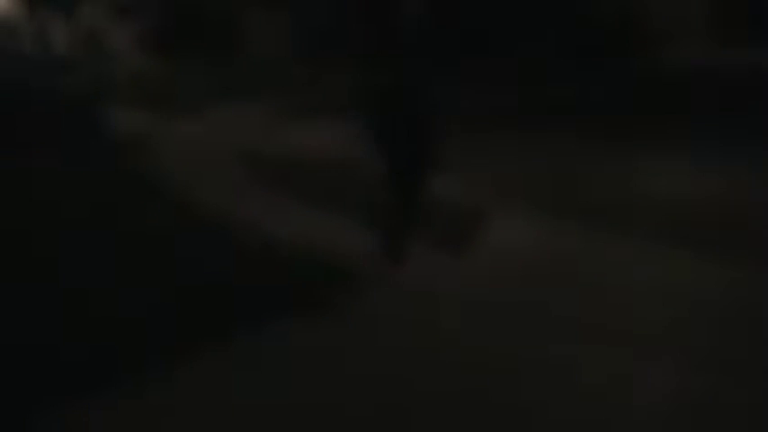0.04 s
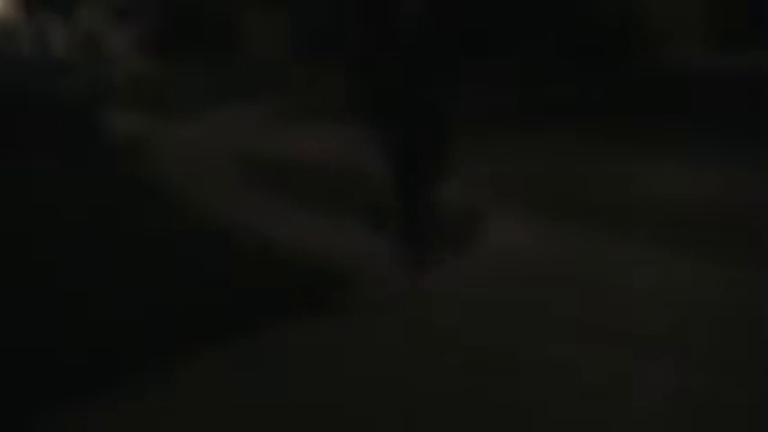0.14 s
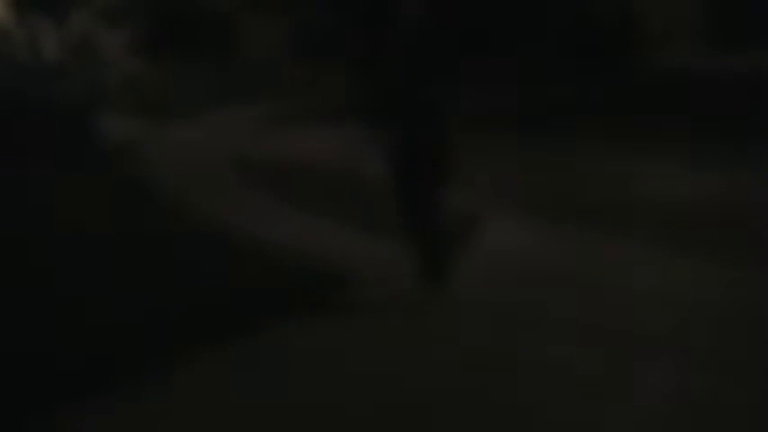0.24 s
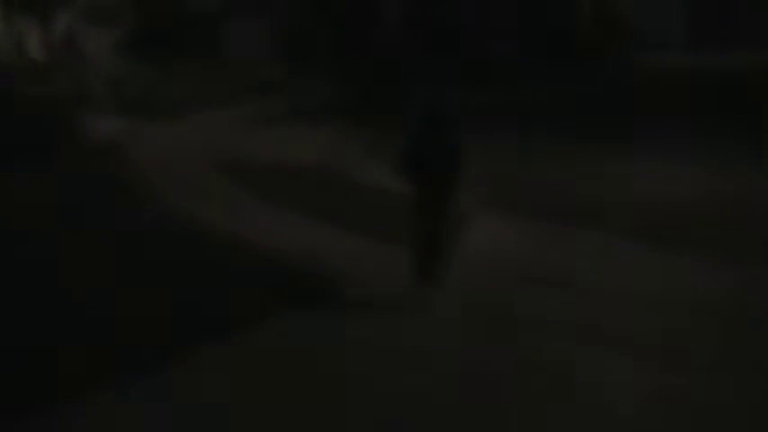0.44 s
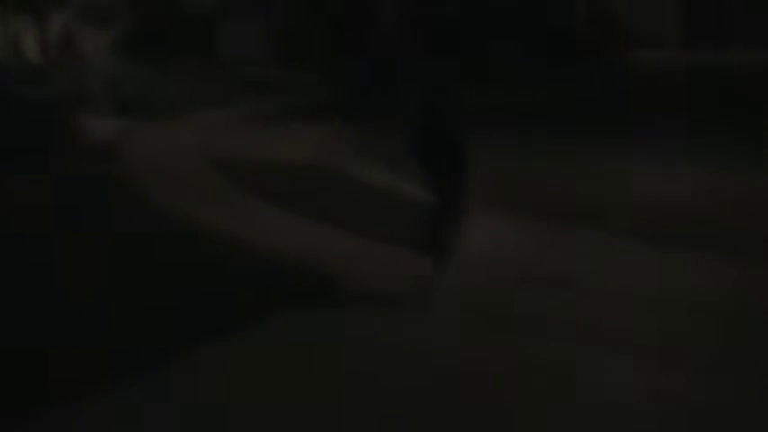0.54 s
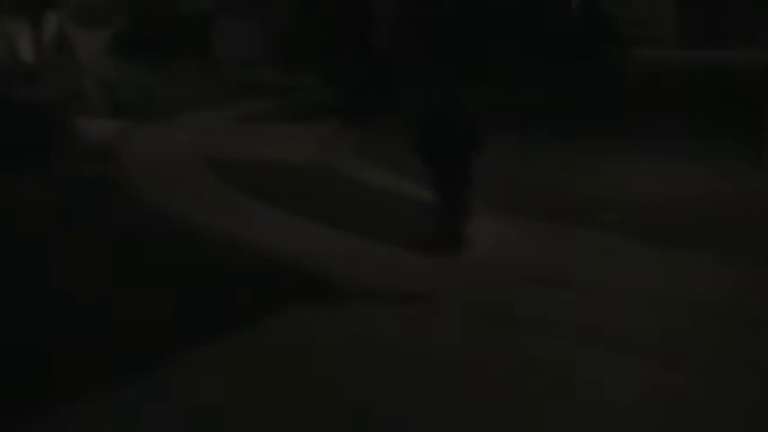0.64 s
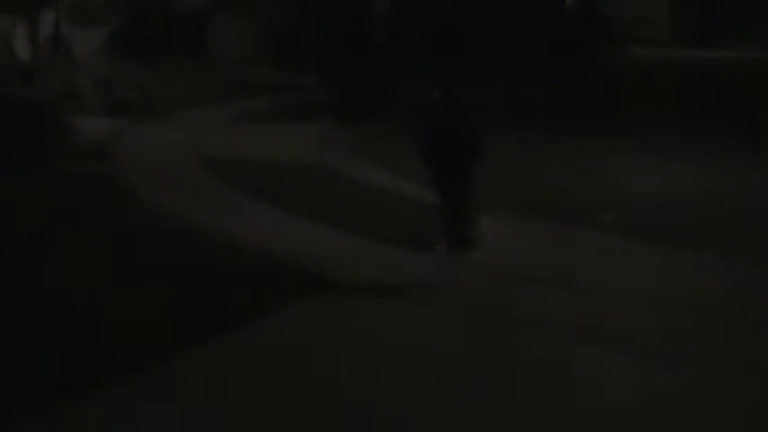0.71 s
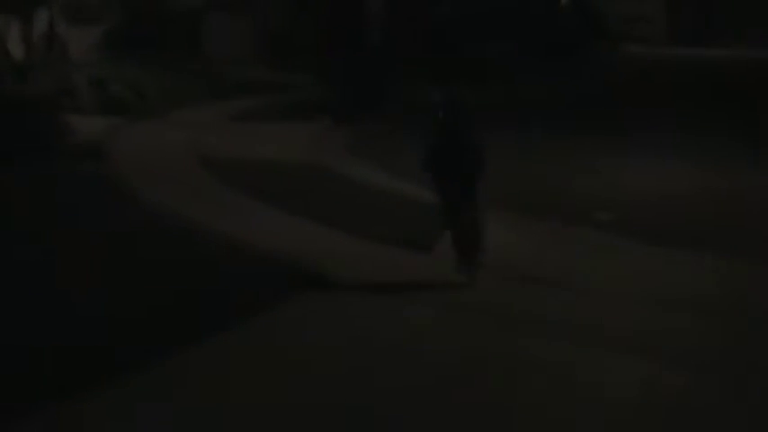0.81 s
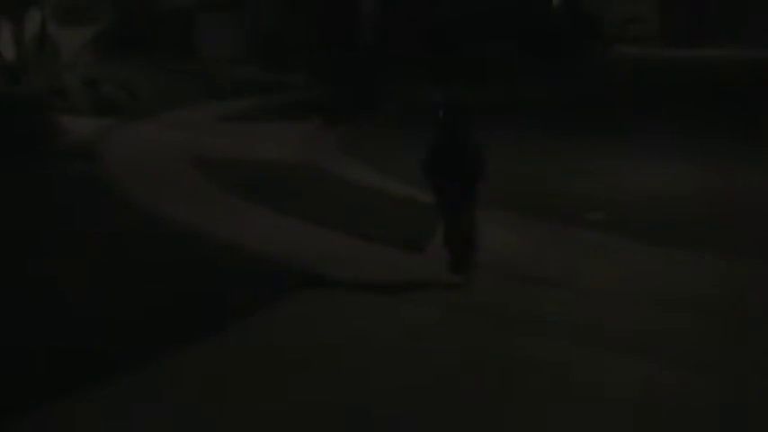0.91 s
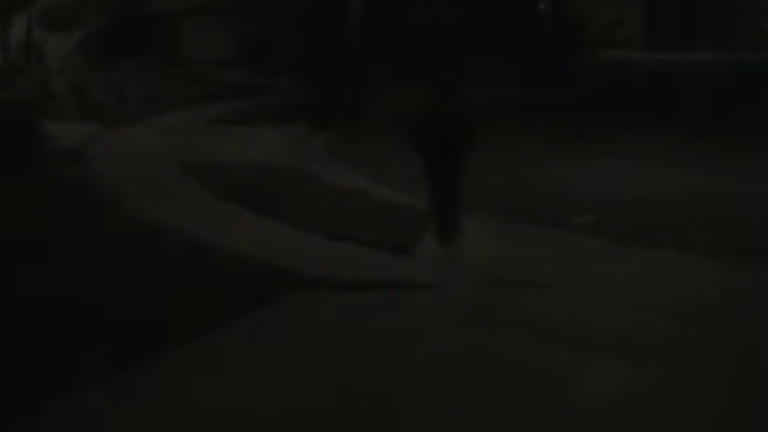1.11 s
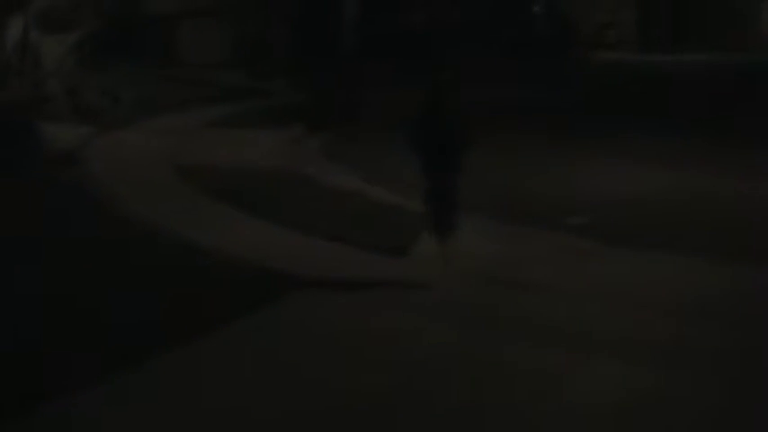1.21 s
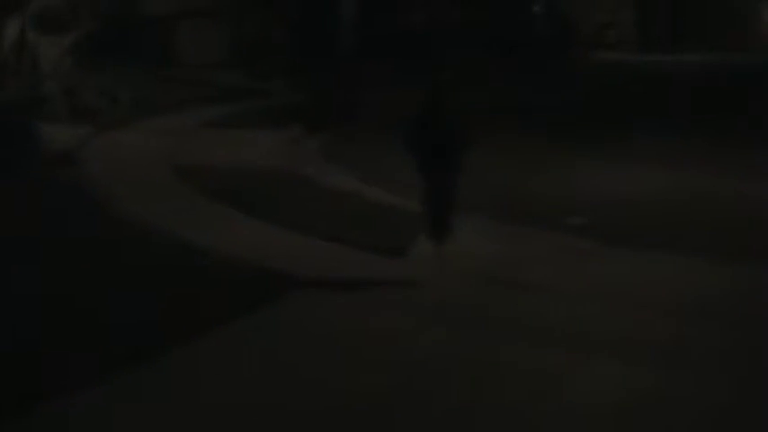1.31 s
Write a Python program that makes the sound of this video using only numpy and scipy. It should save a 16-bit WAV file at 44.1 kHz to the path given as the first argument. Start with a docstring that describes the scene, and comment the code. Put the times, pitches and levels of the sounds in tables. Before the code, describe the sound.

Pogo stick clacking and scraping through two bounces outdoors, over a low town rumble.

```python
"""Pogo stick in a night street

A pogo stick bounces twice on pavement. Each landing thumps the frame and sets the metal tube clacking.
Sliding friction makes the shaft scrape in and out; the spring hums as it extends, and the shaft strikes
its end stop. Faint ticks fall between the clacks, and houses reflect echoes over a low town rumble."""
import sys
import numpy as np
from scipy import signal
from scipy.fft import rfft, irfft, next_fast_len
from scipy.io import wavfile
from scipy.ndimage import map_coordinates

SR = 44100
rng = np.random.default_rng(int(sys.argv[2]) if len(sys.argv) > 2 else 0)


def unload_wav(signal):
    """Save mono or channel-first audio to the path in sys.argv[1] as 16-bit WAV at rate SR, clipped to [-1, 1]."""
    wavfile.write(
        sys.argv[1],
        SR,
        np.round(np.clip(np.atleast_2d(signal).T, -1, 1) * 32767).astype(np.int16),
    )


N = 59535

# the foot lands: start_s, unused, thud_db, knock_db, body_db, clang_db, crack_db
LANDINGS = [(0.246, -1, -31, -24.5, -13.5, -20, -16), (0.81, -2, -31.5, -27.5, -16, -18, -16)]
# the shaft hits its end stop: same columns
TAKEOFFS = [(0.489, -3, -33.5, -28, -24, -17, -14.5), (1.052, -1, -31.5, -23.5, -22, -24.5, -17.5)]
# modes of the tube: pitch_hz, t60_s, landing_db, first_takeoff_db, second_takeoff_db
TUBE_MODES = [(770, 0.02, -8, -10, 5), (1162, 0.034, -0.5, 1.5, -8), (1372, .07, -10.5, -35, -3.5),
              (1686, 0.043, 3.5, -31, -21), (1845, 0.061, -2, -9, -4.5), (2130, .04, 2, -16, -12),
              (2516, 0.036, -8, 6, -10), (2770, 0.035, 1.5, 11, -5), (3525, 0.085, -12, -4, -2),
              (3412, 0.072, -0.5, -34, -1), (5760, 0.041, -5.5, 5, 3.5), (6760, 0.032, -18, 3, 7.5),
              (7950, 0.039, 0.5, 5.5, 3), (9160, 0.016, -13, 12, -24)]
ONSET_LEAD_S = 0.000688  # first touch comes just before the full blow


def amp(db):
    """Decibels to amplitude ratio."""
    return 10 ** (np.asarray(db) / 20)


def unit(x):
    """Normalisation to rms 1."""
    return x / np.sqrt(np.mean(x ** 2) + 1e-20)


def along(points, hz):
    """Interpolation of (hz, value) points on a log frequency axis."""
    f, v = np.transpose(points)
    return np.interp(np.log(hz + 1), np.log(f + 1), v)


def filtered(x, response):
    """Linear filtering: the spectrum of x times a frequency response."""
    m = next_fast_len(N + SR // 2)
    return irfft(rfft(x, m) * response(np.fft.rfftfreq(m, 1 / SR)), m)[..., :N]


def resonance(f, hz, width_hz):
    """Frequency response of a damped oscillator."""
    return 1j * f * width_hz / (hz * hz - f * f + 1j * f * width_hz)


def band(x, lo_hz, hi_hz, order=2):
    """Causal band-pass filter."""
    sections = signal.butter(order, [lo_hz, min(hi_hz, SR / 2 - 1)], 'band', fs=SR, output='sos')
    return signal.sosfilt(sections, x)


def since(start_s):
    """Elapsed seconds at each sample."""
    return np.arange(N) / SR - start_s


def fade(start_s, attack_s, hold_s, decay_s):
    """Envelope: linear rise, hold and exponential decay."""
    t = since(start_s)
    return np.clip(t / attack_s, 0, 1) * np.exp(-np.maximum(t - hold_s, 0) / decay_s)


def wobble(rate_hz):
    """Smooth random modulation: a spline through rate_hz knots a second."""
    knots = rng.standard_normal(int(N * rate_hz / SR) + 4)
    return map_coordinates(knots, [np.arange(N) * rate_hz / SR])


def noise(spectrum):
    """Spectrally shaped noise of rms 1."""
    return unit(filtered(rng.standard_normal(N), lambda f: amp(along(spectrum, f))))


def grit(rate_hz, spread_db):
    """Shot noise of rms 1: tiny random contacts of uneven size."""
    contacts = (rng.random(N) < rate_hz / SR) * rng.choice([-1, 1], N)
    return unit(contacts * amp(spread_db * np.clip(rng.standard_normal(N), -2, 2)))


def night():
    """Background noise: town rumble and distant air, with a faint treble hiss that rises and falls; at first it
    is the dying tail of an earlier bounce."""
    # spectra of the three layers: frequency_hz, level_db
    rumble = [(15, -52), (25, -24), (54, -20), (97, -2), (129, -7), (190, -7.5), (281, -12.5), (394, -18),
              (500, -26), (650, -44.5), (1100, -120)]
    air = [(180, -19), (300, -10.5), (396, -0.5), (515, 0), (1110, -0.5), (1440, -7), (2690, -7.5),
           (5350, -18), (8190, -19.5), (15000, -42)]
    hiss = [(800, -5), (2200, 1), (4500, -5.5), (8500, -8), (12000, -24), (16000, -50)]
    # envelope of the hiss: time_s, level_db
    hiss_levels = [(0, -48.5), (0.13, -47), (0.21, -59), (0.6, -51), (0.78, -55.5), (1.22, -52),
                   (1.35, -72)]
    hiss_db = np.interp(since(0), *np.transpose(hiss_levels))
    return amp(-49) * noise(rumble) + amp(-51) * noise(air) + amp(hiss_db) * noise(hiss)


def street(x):
    """Reflection and scattering: a thin diffuse tail and smeared echoes from the houses."""
    # reverberation time: frequency_hz, t60_s
    decay_times = [(150, 0.21), (600, 0.68), (1500, 0.38), (4000, .4), (8000, 0.26), (15000, 0.15)]
    # walls and house fronts: delay_s, level_db, smear_s, cutoff_hz
    walls = [(.048, -26, 0.0078, 4090), (0.188, -30, .02, 6800), (0.388, -28.5, .025, 2600)]
    hz, t, spectra = signal.stft(rng.standard_normal(N), SR, nperseg=256)
    decay = amp(-60 * t / along(decay_times, hz)[:, None])
    tail = signal.istft(spectra * decay, SR, nperseg=256)[1][:N] * fade(0.0078, 0.0041, 1, 1)
    response = amp(-21) * unit(tail)
    for delay_s, db, smear_s, cutoff_hz in walls:
        reflection = band(rng.standard_normal(N), 650, cutoff_hz) * fade(delay_s, 0.0017, 0, smear_s)
        response += amp(db) * unit(reflection) * np.sqrt(cutoff_hz / (SR / 2))
    echo = signal.fftconvolve(x, response / np.sqrt(N))[:N]
    blur_rad = 1.97 * wobble(rate_hz=220)  # scattering blurs the pitch
    return np.real(signal.hilbert(echo) * np.exp(1j * blur_rad))


def ticks():
    """Transients: an earlier bounce's echo off the houses, then the stick's rattles or close echoes."""
    # faint ticks: start_s, level_db, band_hz
    bursts = [(0.121, -39, 2900), (0.256, -24, 5100), (0.271, -36, 4800), (0.316, -38, 2400),
              (0.408, -45, 2480), (0.428, -37.5, 7100), (0.473, -32, 8100), (0.504, -22.5, 2480),
              (0.838, -32, 7600), (0.858, -48, 7500), (0.869, -32.5, 7700), (0.996, -37, 1600),
              (1.064, -28, 3590)]
    return sum(amp(db) * fade(s, 0.00042, 0.0044, 0.0042)
               * unit(band(grit(rate_hz=7000, spread_db=8), hz / 1.9, hz * 1.305, order=3))
               for s, db, hz in bursts)


def spring():
    """Narrow-band resonance: the coil hums roughly as it extends."""
    # swells of the hum: centre_s, spread_s, level_db
    hums = [(0.452, 0.021, -39.5), (1.005, 0.0118, -40)]
    level = sum(amp(db) * np.exp(-(since(s) / spread_s) ** 2 / 2) for s, spread_s, db in hums)
    hum = filtered(rng.standard_normal(N), lambda f: resonance(f, hz=574, width_hz=74) ** 2)
    return level * unit(hum)


def foot():
    """Heavily damped vibration: the rubber tip scuffs, and each blow thumps the frame."""
    # thumps of the frame: start_s, level_db, pitch_hz
    thumps = [(0.2440, -13.5, 207.5), (0.4885, -23, 221), (0.8090, -22.5, 245), (1.0528, -33.5, 267)]
    scuff = (0.2372, -24, 339)  # the tip touches just before the first landing
    return sum(amp(db) * fade(s, 0.0021, 0.0047, 0.0034) * np.sin(2 * np.pi * hz * since(s))
               for s, db, hz in [*thumps, scuff])


def scrape(spectrum):
    """Stick-slip friction: grit in the shaft's guide excites the tube's resonances."""
    # resonances of the tube: pitch_hz, width_hz, level_db
    rings = [(1200, 98, 14), (1360, 67, -12.5), (1830, 390, 8), (3560, 210, 8.5)]

    def body(f):
        ringing = sum(amp(db) * resonance(f, hz, width_hz) for hz, width_hz, db in rings)
        return amp(along(spectrum, f)) * (1 + amp(-9) * ringing)

    friction = grit(rate_hz=9000, spread_db=3.5) * amp(2.5 * wobble(rate_hz=240))
    return unit(filtered(friction, body))


def shaft():
    """Friction noise follows sliding speed: the shaft slows to a stall, then speeds up and brightens."""
    # spectra of the inward and outward scrapes: frequency_hz, level_db
    in_spectrum = [(150, -40), (250, -2.5), (505, -10), (569, -1.5), (788, -7), (1410, -3.5), (2360, -11),
                   (8100, -11), (11400, -19.5), (15000, -52.5)]
    out_spectrum = [(150, -48), (250, -16.5), (569, -3.5), (951, -6.5), (1250, -3), (2400, -9), (2800, -6),
                    (9130, -11), (10800, -18), (15000, -46)]
    full_speed_db = [(-28, -28, -30.5), (-27, -28.5, -42)]  # each bounce: in, out, rasp
    squeeze_s, release_s, stall_db = 0.12, 0.1, -21.5  # from full speed to rest: times, level change
    inward, outward, rasp = np.zeros((3, N))
    for (down, *_), (up, *_), (in_db, out_db, rasp_db) in zip(LANDINGS, TAKEOFFS, full_speed_db):
        contact = fade(down, 0.0048, up - down, 0.014)
        gone_s, left_s = np.maximum(since(down), 0), np.maximum(-since(up), 0)
        inward += contact * amp(in_db + stall_db * (gone_s / squeeze_s) ** 1.35)
        outward += contact * amp(out_db + stall_db * (left_s / release_s) ** 1.55)
        rasp += contact * amp(rasp_db) * np.exp(-left_s / 0.021)  # swells toward the end stop
    sliding = inward * scrape(in_spectrum) + outward * scrape(out_spectrum)
    return sliding + rasp * unit(band(grit(rate_hz=4000, spread_db=-8), 3600, 9600, order=3))


def snaps():
    """Hard contacts are brief and so bright: metal snaps on metal at the end stop."""
    lag_s, levels_db = 0.00061, [-18, -28.5]
    return sum(amp(db) * fade(s + lag_s - ONSET_LEAD_S, 0.000214, 0.0006, 0.00063)
               * unit(band(grit(rate_hz=19400, spread_db=8.5), 5500, 12500))
               for (s, *_), db in zip(TAKEOFFS, levels_db))


def clack(s, levels_db, modes_db, attack_s, hold_s, decay_s, chatter_db, chatter_s, ring_db):
    """Impact and modal decay: a burst of metal contacts, their chatter and the ringing tube."""
    # thud, knock, body, clang and crack bands: low_hz, high_hz, trim_db
    registers = [(160, 347, -2.5), (601, 1050, 0.5), (1098, 2240, -1), (2576, 4100, -1), (5350, 9790, -1)]
    blow = fade(s, attack_s, hold_s, decay_s)
    chatter = amp(chatter_db) * fade(s, attack_s, hold_s, chatter_s)
    x = grit(rate_hz=14000, spread_db=4.5) * (blow + chatter)
    for (hz, t60_s, *_), db in zip(TUBE_MODES, modes_db):
        ring = amp(ring_db + db) * fade(s, attack_s, 0, t60_s / np.log(1000))
        x += ring * np.sin(2 * np.pi * (hz * since(s) + rng.random()))
    share = np.sqrt(0.03 * SR / N)  # refers each band's rms to 30 ms
    return share * sum(amp(db + trim_db) * unit(band(x, lo, hi, order=3))
                       for db, (lo, hi, trim_db) in zip(levels_db, registers))


def clacks():
    """Excitation sets timbre: blunt landings chatter, the sharp end stop rings."""
    _, _, landing_modes, *takeoff_modes = np.transpose(TUBE_MODES)
    down = sum(clack(s - ONSET_LEAD_S, levels, landing_modes, attack_s=0.0019, hold_s=0.0029,
                     decay_s=0.0023, chatter_db=1, chatter_s=0.011, ring_db=-8.5)
               for s, _, *levels in LANDINGS)
    up = sum(clack(s - ONSET_LEAD_S, levels, modes, attack_s=0.0011, hold_s=0.0015,
                   decay_s=0.0032, chatter_db=-11.5, chatter_s=0.015, ring_db=-9.5)
             for (s, _, *levels), modes in zip(TAKEOFFS, takeoff_modes))
    return amp(-6) * down + amp(-4.5) * up


def scene():
    """Mid-side stereo: the stick is straight ahead; echoes and background are a little wider."""
    # stereo width: frequency_hz, side_db
    width = [(30, -20.5), (100, -19.5), (1000, -16), (5000, -17.5), (9000, -11), (12000, -4)]
    side_gain = lambda f: amp(along(width, f))
    stick = clacks() + snaps() + foot() + shaft() + spring() + ticks()
    mid = stick + street(stick) + night()
    scatter = unit(rng.standard_normal(N) * fade(0, 0.0011, 0, 0.0041)) / np.sqrt(N)
    side = filtered(signal.fftconvolve(stick, scatter)[:N], side_gain)
    side += amp(-8.5) * street(stick) + amp(9) * filtered(night(), side_gain)
    return np.array([mid + side, mid - side])


def record(dry):
    """Transduction: two slightly unlike microphones, clipping at full scale and a band limit."""
    # channel imbalance: frequency_hz, left_minus_right_db
    balance = [(60, 1.5), (200, 2.6), (700, 0.9), (1500, -1), (4400, 0), (8100, 1), (10500, 0), (13000, -4)]
    # common response: frequency_hz, gain_db
    colour = [(100, -1), (9500, -0.5), (12000, 0), (14500, -4), (15700, -3.5), (16600, -10)]
    pair = filtered(dry, lambda f: amp(along(colour, f) + np.array([[.5], [-.5]]) * along(balance, f)))
    return filtered(np.clip(pair, -1, 1), lambda hz: hz < 16600)


dry = scene()
out = record(dry)
unload_wav(out)
```